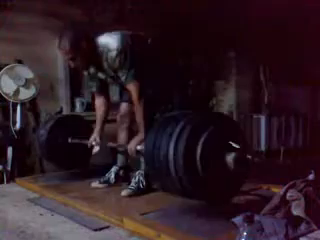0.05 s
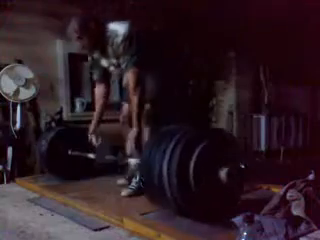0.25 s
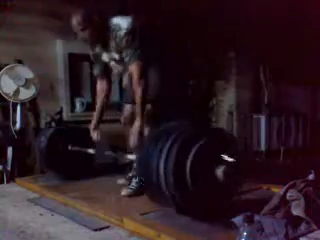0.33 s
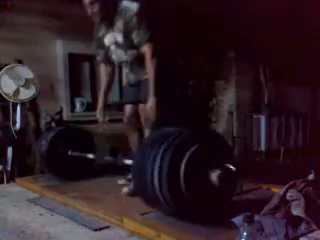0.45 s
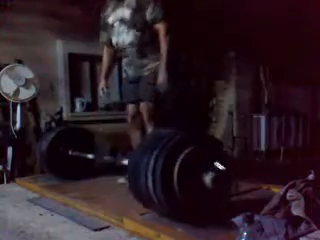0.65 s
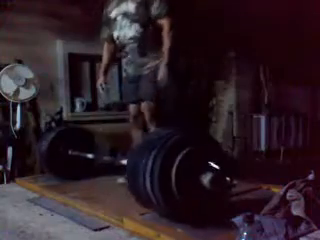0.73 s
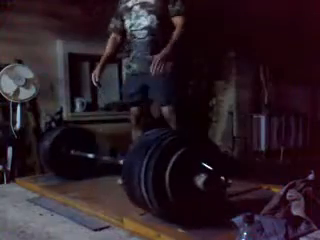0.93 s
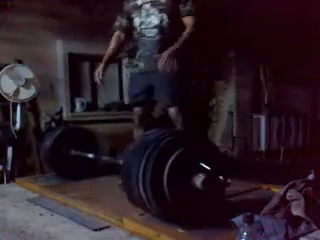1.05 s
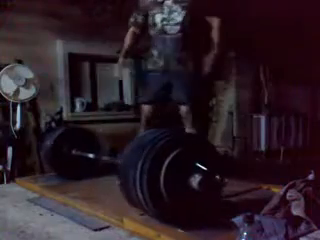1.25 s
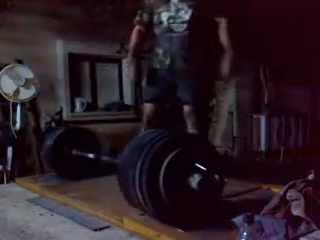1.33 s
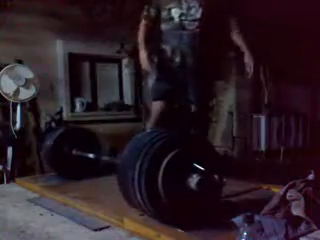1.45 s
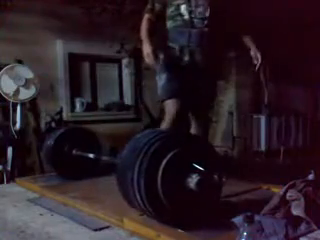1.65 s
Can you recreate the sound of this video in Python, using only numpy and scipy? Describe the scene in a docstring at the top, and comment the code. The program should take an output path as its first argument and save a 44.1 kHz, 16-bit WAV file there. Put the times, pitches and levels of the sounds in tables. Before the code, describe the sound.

A loaded barbell drops on wood with loud thumps, clattering plates and ringing steel.

```python
"""Low background noise, louder at first, ducks as a loaded barbell crashes onto a wooden platform in a
garage. The bar bounces twice and rocks to rest. Each landing thumps the boards; a moment later the loose
plates clatter on the sleeves and set the steel ringing. One microphone stands near the platform, with
the short tail of the room behind the sound, and overloads on the hardest blows."""
import sys
import numpy as np
from scipy import signal
from scipy.fft import rfft, irfft, next_fast_len
from scipy.io import wavfile
from scipy.ndimage import uniform_filter1d, map_coordinates

SR = 44100
rng = np.random.default_rng(int(sys.argv[2]) if len(sys.argv) > 2 else 0)


def int16_out(signal):
    """Quantize to a 16-bit WAV file."""
    q = np.round(np.clip(np.atleast_2d(signal).T, -1, 1) * 32767)
    wavfile.write(sys.argv[1], SR, q.astype(np.int16))


N = 74970

# Spectra of the room air and the opening noise. Each row: frequency in Hz, relative level in dB.
AIR_SPECTRUM = [(15, -40.5), (25, -14), (54, 1), (86, -18.5), (127, -0.5), (208, -7), (451, -13),
                (665, -22), (861, -18), (12000, -52.5), (15600, -72), (22000, -120)]
OPENING_NOISE_SPECTRUM = [(15, -43.5), (25, -12), (118, -9), (269, -4), (306, -3.5), (451, -15), (500, -9),
                          (718, -23), (1060, -22), (12000, -43), (15600, -61.5), (22000, -120)]
# The garage's reverberation. Each row: frequency in Hz, time to fall 60 dB (T60) in seconds.
GARAGE_DECAY = [(100, 0.44), (500, .34), (1500, 0.31), (4000, 0.27), (11000, 0.2)]
# Blows on the platform. Each row: start in seconds, thump in dB, floor boom in dB, cut-off in Hz.
PLATFORM_BLOWS = [(0.196, -14.5, -46, 348), (0.2199, -3, -23.5, 900), (0.257, -12.5, -14.5, 397),
                  (0.277, -27.5, -19, 610), (0.333, -25, -29, 600), (0.414, -26.5, -43, 500),
                  (.43, -27.5, -52, 400), (0.5172, -5.5, -20, 900), (0.527, -9.5, -22.5, 450),
                  (.575, -15.5, -20.5, 500), (0.647, -28, -37.5, 400), (0.715, -14.5, -26, 330),
                  (0.733, -14.5, -36.5, 900), (0.782, -10, -41, 140), (0.804, -15, -26.5, 333),
                  (.868, -15.5, -37.5, 240), (0.931, -10.5, -48, 139), (0.984, -18, -59, 330),
                  (1.063, -22.5, -62, 333), (1.166, -36.5, -65, 329.7), (1.258, -22.5, -64.5, 264),
                  (1.303, -34.5, -64, 400), (1.465, -29, -62, 271.4)]
# Bursts of plates knocking together. Each row: start and length in seconds, level in dB,
# then treble and steel ring in dB relative to that level.
PLATE_RATTLES = [(0.173, 0.088, -37.5, 5, -4.5), (.228, .03, -9, 0, -7), (0.256, 0.032, -10, 1.5, -3),
                 (0.321, 0.026, -18.5, 2, -3.5), (0.386, 0.043, -27, -7, 6), (.527, .033, -10.5, 0, -6),
                 (0.547, 0.044, -13, 1, 3.5), (0.625, 0.02, -24.5, -6, 7), (.728, .016, -12, -4, -6),
                 (0.746, 0.056, -20.5, 4, -10.5), (0.797, .04, -18, -1.5, 3),
                 (0.858, 0.052, -16.5, 4.5, -5.5), (0.943, .045, -18, -1, -3), (1.021, 0.0099, -23, 4, 1),
                 (1.049, 0.017, -21.5, 3, 2.5), (1.19, 0.016, -45, -21.5, 17),
                 (1.245, 0.012, -52, -20.5, 17.5), (1.302, 0.016, -46.5, -25, 15.5)]
# The plate stack hitting the collar. Each row: start in seconds, clang in dB, crack in dB.
COLLAR_SLAMS = [(0.2288, -4.5, 3.5), (.527, -9.5, -13.5), (.732, -17, -24.5)]
# Spectra of the boards' thud and of a plate knock's body and bright edge.
# Each row: frequency in Hz, relative level in dB.
THUD_SPECTRUM = [(30, -20.5), (80, -13.5), (130, -4.5), (190, -3.5), (280, -4.5), (450, -2), (700, -5.5),
                 (1200, -9), (4000, -22.5), (12000, -53)]
BODY_SPECTRUM = [(60, -28), (160, -3), (300, 2.5), (600, 1), (850, -4), (1150, 0.5), (1500, -0.5),
                 (1900, 0.5), (2300, -5.5), (3500, -18.5), (8000, -56)]
EDGE_SPECTRUM = [(900, -33), (1900, -9), (2700, 4), (3500, -2.5), (4500, -1), (6300, -7), (8000, -6.5),
                 (9500, -12.5), (12300, -9.5)]
# Modes of the bar and plates, the collar's clang, the boards and the floor.
# Each row: frequency in Hz, relative level in dB, T60 in seconds.
STEEL_MODES = [(280, -5.5, 0.34), (460, -13.5, 1.8), (751, -14, 0.3), (932, -8.5, .5), (1105, -2.5, .34),
               (1254, -7, .36), (1275, -6, 0.52), (1435, -6, 0.7), (1467, 1.5, 0.33), (1555, -6, .26),
               (1797, -16.5, 0.13), (2000, -13, .42), (2627, -15.5, 0.11), (3060, -14, 0.69),
               (3120, -17, .26), (3465, -19, 0.17), (4264, -12.5, 0.24), (4320, -14.5, .24),
               (4780, -20, 0.15), (5160, -20.5, 0.28), (5630, -14.5, .25), (6100, -21.5, 0.26),
               (7010, -24, .17), (7510, -25.5, 0.12), (8550, -21, 0.13), (11800, -31, .17)]
CLANG_MODES = [(1770, -4, 0.17), (1854, -2, 0.3), (1905, -4.5, 0.067)]
WOOD_MODES = [(133, -9, .13), (190, -8.5, 0.16), (271.5, -5.5, .15), (356.5, -3.5, .12),
              (457.3, 1.5, 0.081), (586.3, -6, .12), (695.6, -8, 0.13), (762, -7, 0.076)]
BOOM_MODES = [(38, -16, 0.15), (64, 2, 0.17), (76, -1.5, 0.18)]


def amp(db):
    """Decibels to gain."""
    return 10 ** (np.asarray(db) / 20)


def unit(x):
    """Scale to rms 1."""
    return x / np.sqrt(np.mean(x ** 2) + 1e-20)


def along(points, hz):
    """Read (Hz, value) points on a log frequency axis."""
    freqs, values = np.transpose(points)
    return np.interp(np.log(hz + 1), np.log(freqs + 1), values)


def since(start):
    """Seconds since start, zero before it."""
    return np.maximum(np.arange(N) / SR - start, 0)


def wobble(per_s):
    """A smooth random curve with per_s knots a second."""
    coarse = np.arange(0, N + 64, 64)
    curve = map_coordinates(rng.standard_normal(1024), [coarse * per_s / SR], mode="wrap")
    return np.interp(np.arange(N), coarse, curve)


def filtered(x, response):
    """Filter x by a gain given as a function of Hz."""
    size = next_fast_len(N + SR // 2)
    return irfft(rfft(x, size) * response(np.fft.rfftfreq(size, 1 / SR)), size)[:N]


def noise(spectrum):
    """Coloured noise of rms 1."""
    return unit(filtered(rng.standard_normal(N), lambda hz: amp(along(spectrum, hz))))


def steadied(x, samples):
    """Even out the level of x over a sliding window."""
    return x / np.sqrt(np.abs(uniform_filter1d(x * x, samples)) + 1e-12)


def struck(modes, start):
    """Decaying sines set ringing by one blow."""
    t = np.arange(SR // 3) / SR
    ring = sum(amp(db - 60 * t / t60) * np.sin(2 * np.pi * hz * t) for hz, db, t60 in modes)
    return np.pad(ring, (int(start * SR), N))[:N]


def background(air_db=-48.5, opening_noise_db=-40, fall_db_per_s=338):
    """Quiet room air and low background noise, louder at first, that ducks when the crash hits."""
    air = amp(air_db) * noise(AIR_SPECTRUM)
    return air + amp(opening_noise_db - fall_db_per_s * since(0.2)) * noise(OPENING_NOISE_SPECTRUM)


def garage(x):
    """What the walls send back to the microphone: a short tail whose treble dies first."""
    hz, t, bins = signal.stft(rng.standard_normal(SR // 2), SR, nperseg=256)
    decay = amp(-60 * t / along(GARAGE_DECAY, hz)[:, None])
    tail = signal.istft(bins * decay, SR, nperseg=256)[1]
    return signal.fftconvolve(x, tail / np.linalg.norm(tail))[:N]


def steel(hard_contact_hz=2400, flutter_db=3, wander_rad=0.6):
    """Rattles pump energy into the bar and plates, whose modes waver and ring out."""
    start, length, level_db, treble_db, ring_db = np.transpose(PLATE_RATTLES)
    touching = np.array([(since(on) > 0) & (since(off) == 0) for on, off in zip(start, start + length)])
    soft_power = amp(level_db + ring_db) ** 2 @ touching
    hard_power = amp(level_db + ring_db + treble_db) ** 2 @ touching
    out = np.zeros(N)
    for hz, db, t60 in STEEL_MODES:
        soft_share = 1 / (1 + (hz / hard_contact_hz) ** 10)  # only hard knocks reach the high modes
        drive = soft_share * soft_power + (1 - soft_share) * hard_power
        retained = amp(-120 / (t60 * SR))  # energy left after one sample
        level = np.sqrt(signal.lfilter([1 - retained], [1, -retained], drive))
        phase = 2 * np.pi * (hz * since(0) + rng.random()) + wander_rad * wobble(per_s=32)
        out += level * amp(db + flutter_db * wobble(per_s=32)) * np.sin(phase)
    return out


def collar(crack_t60_s=0.0061):
    """After each big landing the whole stack slams into the collar: a crack and a short clang."""
    out = np.zeros(N)
    for start, clang_db, crack_db in COLLAR_SLAMS:
        t = since(start)
        crack = (t > 0) * amp(crack_db - 60 * t / crack_t60_s) * rng.standard_normal(N)
        out += crack + amp(clang_db) * struck(CLANG_MODES, start)
    return out


def plate_shimmer(ripple_db=3.5):
    """A crowd of small plate resonances, each swelling and fading as the contacts shift; rms 1."""
    bins = signal.stft(noise(EDGE_SPECTRUM), nperseg=1024)[2]
    ripple = uniform_filter1d(rng.standard_normal(bins.shape), size=2, axis=0)  # smooth in frequency
    ripple = uniform_filter1d(ripple, size=8, axis=1)  # and in time
    return unit(signal.istft(bins * amp(ripple_db * unit(ripple)), nperseg=1024)[1][:N])


def burst(start, length, fall_db_per_s, attack_s=0.0026):
    """Envelope of a rattle: quick attack, hold, steady fall in dB."""
    return (1 - np.exp(-since(start) / attack_s)) * amp(-fall_db_per_s * since(start + length))


def plates(knocks_per_s=1400, spread_db=1.5, knock_t60_s=0.021):
    """Loose plates knock together in dense bursts, each knock with a body and a bright edge."""
    knocks = (rng.random(N) < knocks_per_s / SR) * amp(spread_db * rng.standard_normal(N))
    knock_power = signal.lfilter([1], [1, -amp(-120 / (knock_t60_s * SR))], knocks ** 2)
    grain = steadied(np.sqrt(knock_power), samples=1300)
    body_power, edge_power = np.zeros((2, N))
    for start, length, db, treble_db, _ in PLATE_RATTLES:
        body_power += (amp(db) * burst(start, length, fall_db_per_s=338)) ** 2
        edge_power += (amp(db + treble_db) * burst(start, length, fall_db_per_s=355.5)) ** 2
    body = np.sqrt(body_power) * noise(BODY_SPECTRUM)
    edge = np.sqrt(edge_power) * plate_shimmer()
    return grain * (body + amp(-5) * edge)


def platform(thud_t60_s=0.089):
    """Each landing thumps the boards, duller when the contact is soft, and shakes the floor."""
    out = np.zeros(N)
    for start, thump_db, boom_db, cutoff_hz in PLATFORM_BLOWS:
        t = since(start)
        contact_db = lambda hz: -10 * np.log10(1 + (hz / cutoff_hz) ** 4)
        wood = filtered(rng.standard_normal(N), lambda hz: amp(along(THUD_SPECTRUM, hz) + contact_db(hz)))
        thud = steadied(wood, samples=700) * amp(1 - 60 * t / thud_t60_s)
        ring = struck([(hz, db + contact_db(hz), t60) for hz, db, t60 in WOOD_MODES], start)
        attack = 1 - np.exp(-t * cutoff_hz)
        out += amp(thump_db) * attack * (thud + ring) + amp(boom_db) * struck(BOOM_MODES, start)
    return out


def scene():
    """The barbell heard from beside the platform; thumps and clatter also carry to the walls."""
    thumps, clatter = platform(), plates()
    room = garage(amp(-10.5) * thumps + amp(-3.5) * clatter)
    direct = thumps + amp(-1) * clatter + amp(-3.5) * steel() + collar()
    return (direct + room + background())[None]


def record(dry):
    """The near microphone flattens the highest peaks and passes nothing above its band limit."""
    ceiling, knee, top_hz = 0.98, 4, 12480
    clipped = dry[0] / (1 + np.abs(dry[0] / ceiling) ** knee) ** (1 / knee)
    return filtered(clipped, lambda hz: np.clip((top_hz - hz) / 200 + 0.5, 0, 1))[None]


dry = scene()
out = record(dry)
int16_out(out)
```